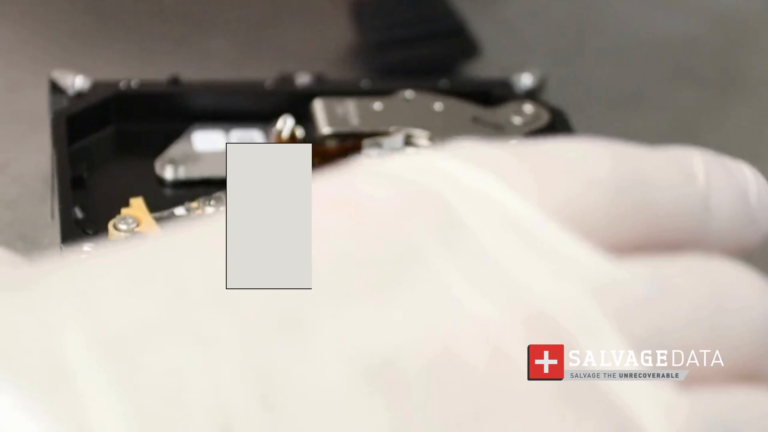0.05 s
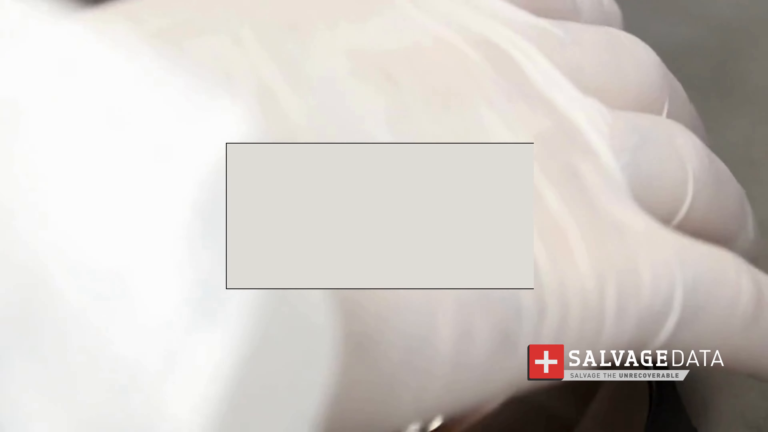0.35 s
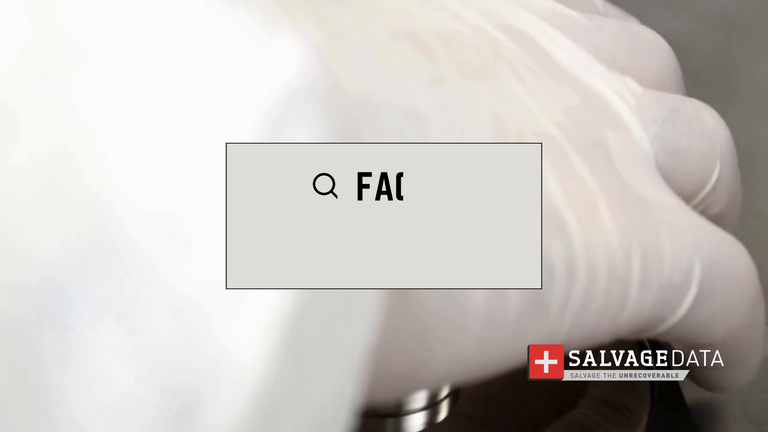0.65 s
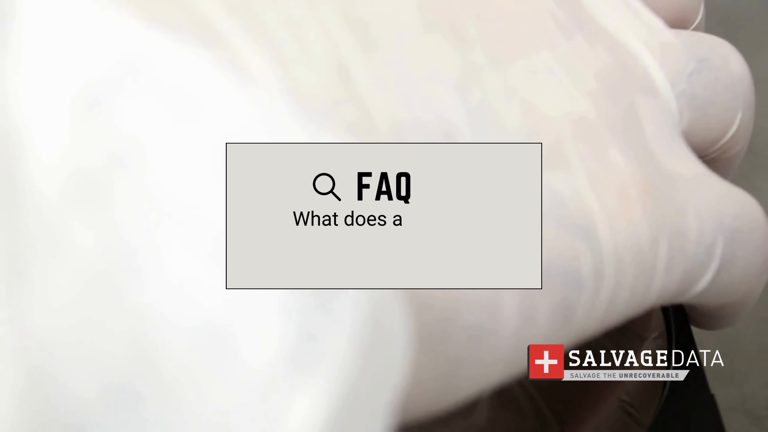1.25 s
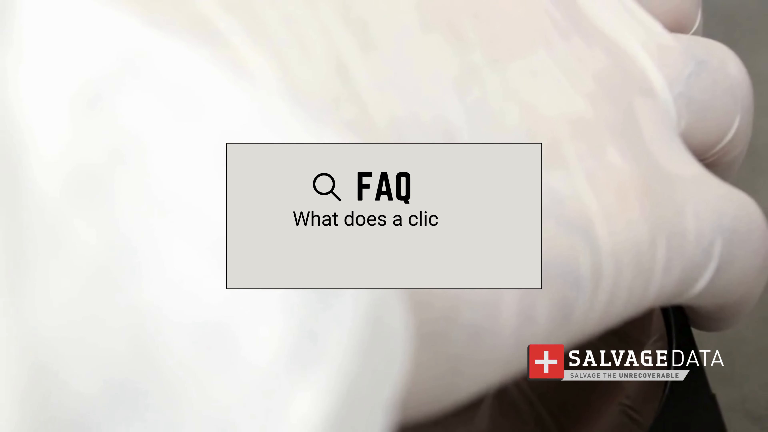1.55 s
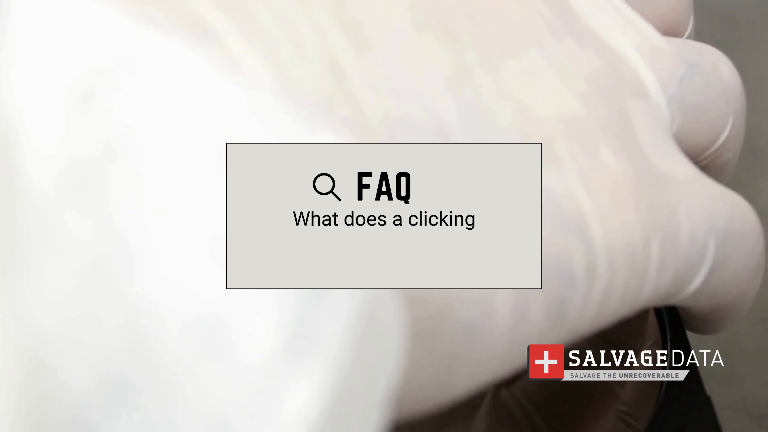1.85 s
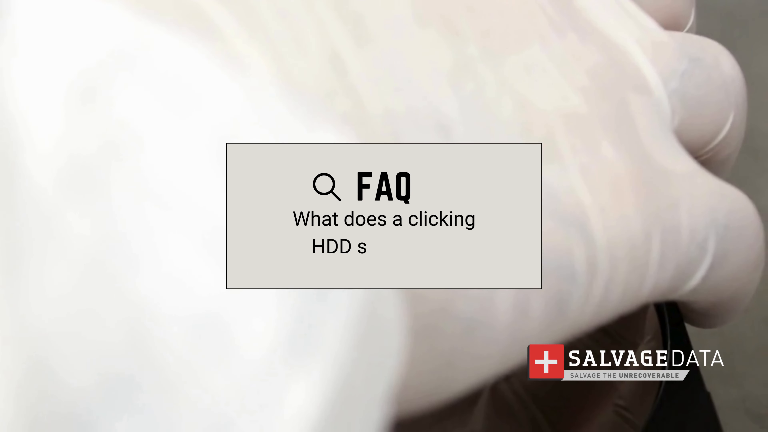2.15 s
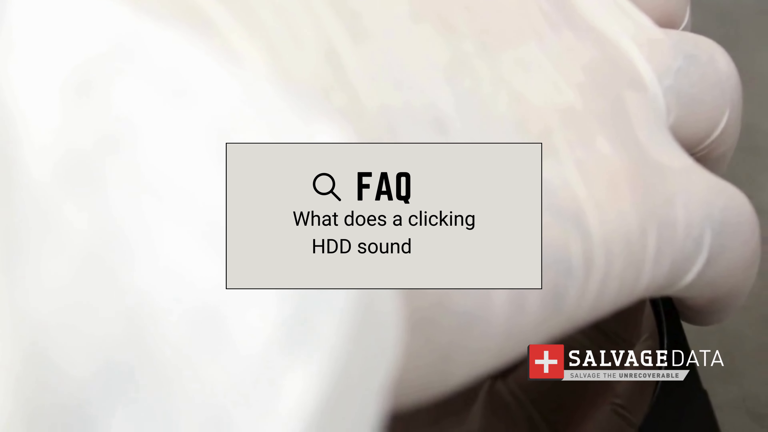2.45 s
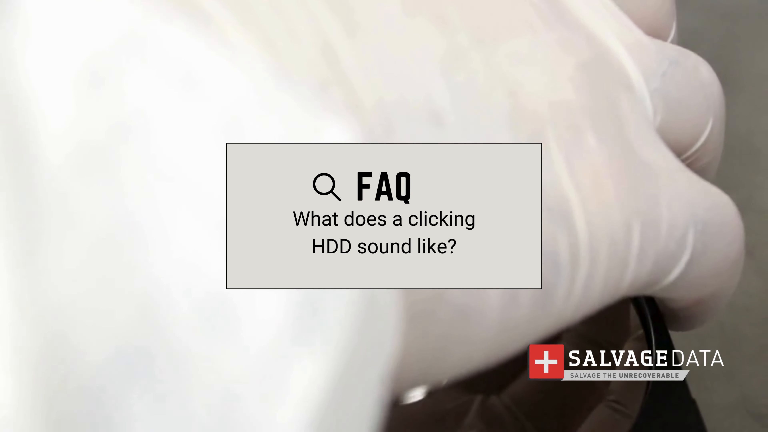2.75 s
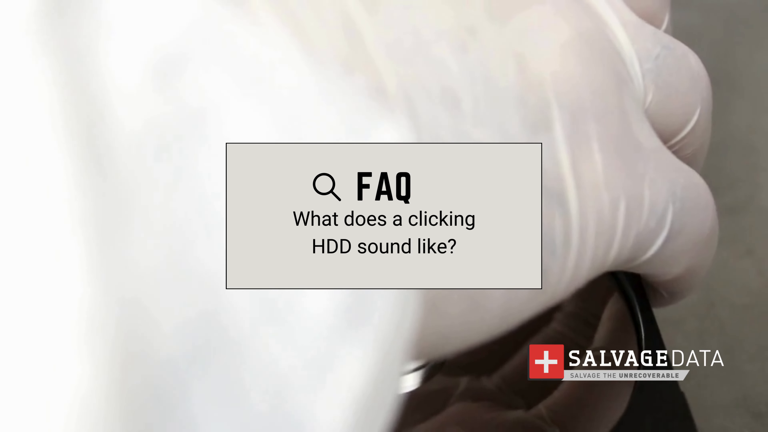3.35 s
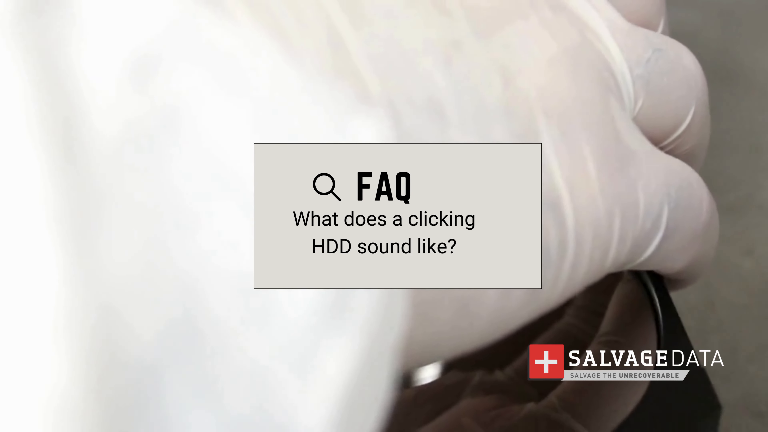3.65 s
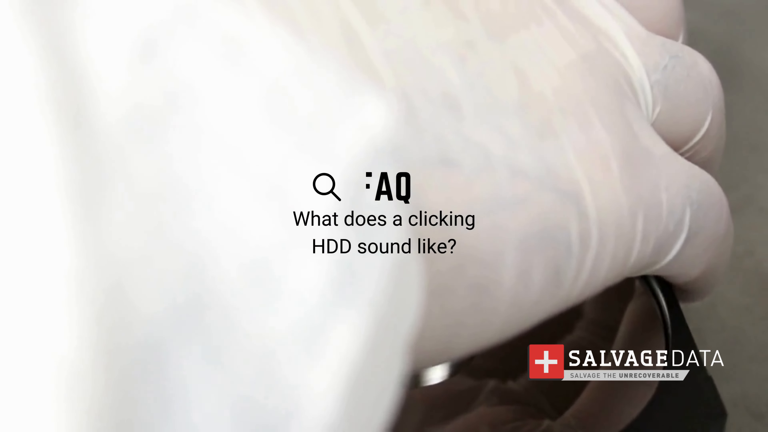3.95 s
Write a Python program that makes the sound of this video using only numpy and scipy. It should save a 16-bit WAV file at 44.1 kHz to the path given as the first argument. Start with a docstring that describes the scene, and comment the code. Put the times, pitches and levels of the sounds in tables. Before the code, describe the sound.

Sharp, irregular clicks from a failing hard drive over a steady low ventilation hum.

```python
"""Three sharp clicks from an opened, failing hard drive, heard in stereo at a bench in a small room.
Each is a short push, a thud, a bright crack and the ring of the metal case, thrown back by the room;
a weaker click trails the first and the third. A thin whine rises and falls before the first click.
Faint ticks and rustles lie between, and the ventilation hums steadily behind it all."""
import sys
import numpy as np
from scipy import signal
from scipy.fft import rfft, irfft
from scipy.io import wavfile
from scipy.ndimage import uniform_filter1d

SR = 44100
rng = np.random.default_rng(int(sys.argv[2]) if len(sys.argv) > 2 else 0)


def put_to_file(sound):
    """Save the sound as 16-bit audio at rate SR, in the file named by the first command-line argument."""
    columns = np.atleast_2d(sound).T  # one column per channel
    safe = np.clip(columns, -1, 1)
    whole_steps = np.round(safe * 32767)
    wavfile.write(sys.argv[1], SR, whole_steps.astype(np.int16))


N = 176400
CASE_RISE_S = 0.000079  # attack of both crack and ring


def amp(db):
    """Decibels to gain."""
    return 10 ** (np.asarray(db) / 20)


def unit_rms(x):
    """Scales to rms 1."""
    return x / np.sqrt(np.mean(x ** 2) + 1e-20)


def unit_energy(x):
    """Scales to energy 1, averaged over the channels."""
    return unit_rms(x) / np.sqrt(x.shape[-1])


def curve(table, hz, column=1):
    """Interpolates one column of a table along log frequency."""
    table = np.array(table)
    return np.interp(np.log(hz + 1), np.log(table[:, 0]), table[:, column])


def add(mix, start_s, sound):
    """Mixes a sound in at its start time."""
    part = mix[:, round(start_s * SR):][:, :sound.shape[-1]]
    part += sound[..., :part.shape[1]]


def pan(db):
    """Left and right gains for a left minus right level."""
    return amp(np.array([[.5], [-.5]]) * db)


def noise_pair(likeness, bins):
    """Left and right noise spectra with the given correlation."""
    mid, side = np.exp(2j * np.pi * rng.random((2, bins)))
    likeness = np.clip(likeness, -1, 1)
    mid, side = mid * np.sqrt(1 + likeness), side * np.sqrt(1 - likeness)
    return np.array([mid + side, mid - side])


def noise_band(hz, width_hz, size):
    """Noise in one resonance, which may follow a pitch curve."""
    offset_hz = np.fft.fftfreq(size, 1 / SR)
    wander = np.fft.ifft(np.exp(2j * np.pi * rng.random(size)) / (1 + (2 * offset_hz / width_hz) ** 2))
    carrier = np.exp(2j * np.pi * np.cumsum(hz * np.ones(size)) / SR)
    return unit_rms((wander * carrier).real)


def waver(size, samples):
    """Smooth random motion of rms 1 that changes over about so many samples."""
    return unit_rms(uniform_filter1d(uniform_filter1d(rng.standard_normal(size), samples), samples))


def ventilation(air_db=-31):
    """Room tone: steady moving air with a few narrow fan and motor tones."""
    # air noise: f/Hz, density/dB
    spectrum = [(12, -33), (25, -5), (38, -0.5), (45, -5), (54, -1), (70, -2), (88, -8), (108, -4.5),
                (140, 2), (172, -2), (194, -7), (245, -3), (295, -7), (440, -9), (520, -15.5), (780, -19.5),
                (1100, -21.5), (1500, -22), (2100, -26), (2700, -29), (3600, -37), (4800, -45), (6800, -43),
                (9500, -46.5), (12500, -51.5), (16000, -59.5)]
    # stereo image of the air noise, centred in the treble: f/Hz, left-right likeness, left minus right/dB
    image = [(60, 0.96, -.5), (129, 1, -0.5), (338, 0.9, 1), (634, 0.7, 1), (1410, 0.13, -2.5),
             (2560, -0.099, -3), (5070, -0.13, -0.5), (7100, 0.85, -1.5), (14900, 1, 2)]
    # fan and motor tones: f/Hz, width/Hz, level/dB
    tones = [(53.1, 2.8, -40.5), (262.7, 24, -49), (695.5, 9.4, -68.5), (963, 8.3, -64.5), (1505, 29, -66),
             (1650, 14, -63), (1910, 15, -88), (2330, 22, -67)]
    hz = np.fft.rfftfreq(N, 1 / SR)
    noise = noise_pair(curve(image, hz), len(hz))
    air = irfft(noise * amp(curve(spectrum, hz)) * pan(curve(image, hz, column=2)), N)
    fans = sum(amp(db) * noise_band(f, width, N) for f, width, db in tones)
    return amp(air_db) * unit_rms(air) + fans


def mode_beating(hz, age, depth_db=5, patch_hz=380, patch_s=0.026):
    """Uneven gain over frequency and time, as of close modes beating; deepest in the treble."""
    field = rng.standard_normal((len(hz), len(age)))
    field = uniform_filter1d(field, max(1, round(patch_hz / hz[1])), axis=0)
    field = uniform_filter1d(field, max(1, round(patch_s / age[1])), axis=1)
    return amp(depth_db * unit_rms(field) * (hz / (hz + 2000))[:, None])


def room_tail(t, rise_s=0.017, grain_db=1):
    """The room throws a click back as a grainy wash, each band dying at its own speed."""
    # reverberation: f/Hz, density/dB, t60/s
    reverb = [(100, -44, 0.3), (283, 19, 0.18), (480, 11, 0.18), (760, 15, .36), (990, 0, .42),
              (1440, 1, 0.52), (2200, 1.5, 0.43), (3300, -3.5, 0.35), (5040, -9.5, 0.4), (6800, -2.5, 0.32),
              (8500, -4.5, 0.35), (11000, 1, 0.25), (13500, -8, 0.28), (16000, -19, 0.24)]
    # stereo width of the reverberation, widest in the midrange: f/Hz, left-right likeness
    likeness = [(100, .97), (400, 0.84), (1000, 0), (2500, 0), (4500, 0.07), (7000, 0.74), (15000, 1)]
    hz = np.fft.rfftfreq(len(t), 1 / SR)
    wash = irfft(noise_pair(curve(likeness, hz), len(hz)) * amp(curve(reverb, hz)))
    band_hz, age, bands = signal.stft(wash, SR, nperseg=256)
    decay = amp(-60 * age / curve(reverb, band_hz, column=2)[:, None])
    tail = signal.istft(bands * decay * mode_beating(band_hz, age), SR)[1][:, :len(t)]
    grain = amp(grain_db * waver(len(t), samples=70))
    return unit_energy(tail * (1 - np.exp(-t / rise_s)) * grain)


def hollow_echo(t, centre_hz, width_hz, spread_s, delay_s=0.047):
    """A hollow note of the room that swells and fades just after a click."""
    hz = np.fft.rfftfreq(len(t), 1 / SR)
    colour = np.exp(-2 * ((hz - centre_hz) / width_hz) ** 2)
    swell = np.exp(-.5 * ((t - delay_s) / spread_s) ** 2)
    return unit_energy(irfft(noise_pair(likeness=1, bins=len(hz)) * colour) * swell)


def rustle(length_s, db, hz, width_hz, grain_db=0.5):
    """A short grainy swell of treble, as of a glove sliding."""
    size = int(length_s * SR)
    grain = unit_rms(amp(grain_db * waver(size, samples=90)))
    return amp(db) * grain * noise_band(hz, width_hz, size) * np.sqrt(np.hanning(size))


def whine(jitter=0.0025, flutter_db=2.8, rasp_db=-4, upper_db=-8, upper_span_s=(.17, .49)):
    """A thin, fluttering glide with a raspy edge, briefly joined by a weaker line above it."""
    # course of the whine: t/s, f/Hz, level/dB
    glide = [(.08, 8500, -70), (.12, 9650, -54), (.148, 10520, -58), (.18, 11600, -56), (.22, 12100, -56),
             (.245, 12480, -59), (.278, 12150, -57), (.31, 11880, -57), (.36, 11700, -56),
             (0.434, 11300, -58), (.478, 10320, -52), (.506, 10730, -48), (.526, 10300, -51),
             (.576, 9270, -64), (.615, 8850, -58), (.655, 8700, -60), (.69, 8300, -70)]
    times, hz, db = np.transpose(glide)
    t = np.arange(N) / SR
    pitch = np.interp(t, times, hz) * (1 + jitter * waver(N, samples=400))
    level = amp(np.interp(t, times, db) + flutter_db * waver(N, samples=150))
    level *= (t > times[0]) & (t < times[-1])
    tone = np.sin(2 * np.pi * np.cumsum(pitch) / SR)
    rasp = noise_band(pitch, width_hz=450, size=N)
    upper_swell = np.sin(np.pi * np.interp(t, upper_span_s, [0, 1]))
    upper = upper_swell * noise_band(pitch + 1730, width_hz=70, size=N)
    return level * (tone + amp(rasp_db) * rasp + amp(upper_db) * upper)


def push(size):
    """The low, minimum-phase pulse with which a click begins."""
    # pulse: f/Hz, density/dB
    spectrum = [(40, -22), (150, -35), (260, -4), (380, 2.5), (520, 1.5), (750, -9.5), (1400, -11.5),
                (2200, -13.5), (4500, -21), (9000, -18), (13000, -29), (16000, -48)]
    log_gain = np.log(amp(curve(spectrum, abs(np.fft.fftfreq(size, 1 / SR)))))
    return unit_energy(np.fft.ifft(np.exp(np.conj(signal.hilbert(log_gain)))).real)


def thud(t, hz=416, t60_s=0.041):
    """The short, low knock of the drive's body."""
    return unit_energy(np.sin(2 * np.pi * hz * t) * amp(-60 * t / t60_s))


def case_ring(t, skew_rad=0.44):
    """The longer modes of the metal case, a little out of step left and right."""
    # case modes: f/Hz, level/dB, t60/s
    modes = [(461, 1, 0.36), (510, 4.5, 0.22), (557, -9.5, 0.71), (722, -1.5, 0.09), (1373, -12.5, 0.24),
             (1527, -4.5, 0.23), (1963, -3, 0.22), (2210, -7, 0.18), (2756, -8, 0.14), (3500, -9, 0.18),
             (6870, -1, 0.16), (9400, -8, .14), (10660, 2, 0.12), (11490, -11, .12)]
    ring = np.zeros((2, len(t)))
    for hz, db, t60 in modes:
        phase = 2 * np.pi * rng.random() + skew_rad * rng.choice([-1, 1]) * np.array([[1], [-1]])
        ring += amp(db - 60 * t / t60) * np.sin(2 * np.pi * hz * t + phase)
    return ring * (1 - np.exp(-t / CASE_RISE_S))


def crack(t, t60_s=0.071):
    """Dense, quickly damped vibration of the arm and case."""
    # vibration: f/Hz, density/dB
    spectrum = [(100, -24), (400, -28), (1050, 6.5), (1400, 5), (2300, 2.5), (3300, 1), (4800, -4),
                (7000, 2), (8500, 1), (11000, 2), (13500, -1.5), (16000, -17)]
    # stereo width of the crack, narrow in the treble: f/Hz, left-right likeness
    likeness = [(300, 0.8), (1000, 1), (2200, 0), (4500, 0.1), (7500, 0.56), (10000, 1), (13000, 0.7)]
    hz = np.fft.rfftfreq(len(t), 1 / SR)
    vibration = irfft(noise_pair(curve(likeness, hz), len(hz)) * amp(curve(spectrum, hz)))
    return unit_energy(vibration * (1 - np.exp(-t / CASE_RISE_S)) * amp(-60 * t / t60_s))


def click(level_db, push_db, thud_db, tilt_db, ring_db, room_db, contact_s,
          echo_hz, echo_db, echo_width_hz, echo_spread_s, *resonances):
    """One knock of the drive and the room's answer, coloured by the resonances that it favours."""
    # direction, mostly a little right of the microphone: f/Hz, left minus right/dB
    direction = [(200, -3), (500, 1.5), (1200, -3), (2500, -5.5), (5000, -2.5), (9000, -1), (13000, -2)]
    # first and second favoured resonance: width/Hz
    widths = [340, 140]
    size = 2 ** 15
    t, hz = np.arange(size) / SR, np.fft.rfftfreq(2 * size, 1 / SR)
    body = amp(4) * crack(t) + amp(thud_db) * thud(t) + amp(ring_db - 37.5) * case_ring(t)
    body += amp(room_db + 5) * room_tail(t)
    body += amp(echo_db) * hollow_echo(t, echo_hz, echo_width_hz, echo_spread_s)
    knock = rfft(body, 2 * size) * amp(tilt_db * np.log2((hz + 300) / 3000))
    softening = 1 + 2j * np.pi * hz * contact_s  # longer contact dulls the push
    knock += amp(push_db + 5) * rfft(push(size), 2 * size) / softening
    for centre_hz, boost_db, width_hz in zip(resonances[::2], resonances[1::2], widths):
        knock *= 1 + (amp(boost_db) - 1) / (1 + 2j * (hz - centre_hz) / width_hz)
    return amp(level_db) * irfft(knock * pan(curve(direction, hz)))[:, :size]


def scene():
    """At the bench: clicks, ticks and rustles over the room tone and the whine."""
    # knocks of the drive: t/s, level/dB, push trim/dB, thud/dB, tilt/dB per octave, ring trim/dB,
    # room trim/dB, contact/s, echo f/Hz, echo level/dB, echo width/Hz, echo spread/s,
    # clack f/Hz, clack boost/dB, ping f/Hz, ping boost/dB
    clicks = [ (0.7222, 1, 0, 0.5, -0.3, 3.5, -1.5, 0.000062, 684, -5, 24, 0.011, 1380, 5.5, 2060, 4.5),
              (0.8118, -10, -3.5, -19, -4, -5, -2.5, 0.000037, 600, -18, 200, 0.022, 1900, 1.5, 3700, 7),
              (3.3340, -1, -3, -2, -2, -0.5, -4, 0.000086, 680, -7.5, 40, 0.013, 2580, 3.5, 10550, 1),
              (3.6687, 2.5, -6, -24, -0.5, -1, -4, 0.000018, 507, 1, 140, 0.03, 2280, 6, 3920, 10),
              (3.987, -15, 3.5, -13, -2.7, 3, 4, 0.000078, 500, -2, 140, .03, 2260, 10, 3930, 7)]
    # faint ticks: t/s, level/dB, resonance f/Hz, boost/dB
    ticks = [(0.606, -25.5, 13000, 5), (1.5813, -27, 6100, 14), (2.5567, -28.5, 4130, 15.5),
             (2.925, -36, 9500, 5), (3.089, -33, 13000, 6), (3.1946, -33.5, 3900, 21)]
    # timbre of all ticks: the click columns from push trim/dB to echo spread/s
    tick_shape = (-25, -20, -2, -5, 0, -3, 600, -7, 200, .02)
    # soft rustles: t/s, length/s, level/dB, f/Hz, width/Hz
    rustles = [(0.035, 0.67, -54.5, 10040, 6000), (.592, 0.041, -57, 11000, 5070),
               (2.55, 0.15, -58.5, 8900, 1900), (2.88, 0.071, -60.5, 10000, 5000),
               (3.548, 0.28, -53, 9430, 5500), (3.58, 0.064, -54, 7350, 400),
               (3.824, 0.038, -56, 11100, 3020)]
    mix = ventilation() + whine()
    for start_s, *settings in clicks:
        add(mix, start_s, click(*settings))
    for start_s, db, *resonance in ticks:
        add(mix, start_s, click(db, *tick_shape, *resonance))
    for start_s, *settings in rustles:
        add(mix, start_s, rustle(*settings))
    return mix


def record(dry):
    """The sound starts after a moment of silence; the highest treble is cut off."""
    start_s, fade_s, cutoff_hz = 0.0348, 0.00083, 16200
    opened = dry * np.clip((np.arange(N) / SR - start_s) / fade_s, 0, 1)
    lowpass = signal.firwin(255, cutoff_hz, window=("kaiser", 9), fs=SR)
    return signal.oaconvolve(opened, lowpass[None], "same")


dry = scene()
out = record(dry)
put_to_file(out)
```